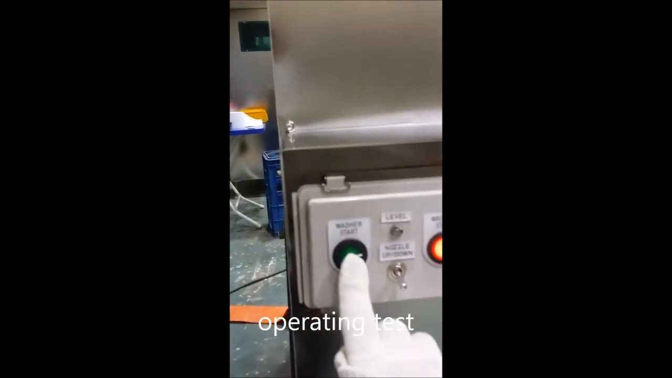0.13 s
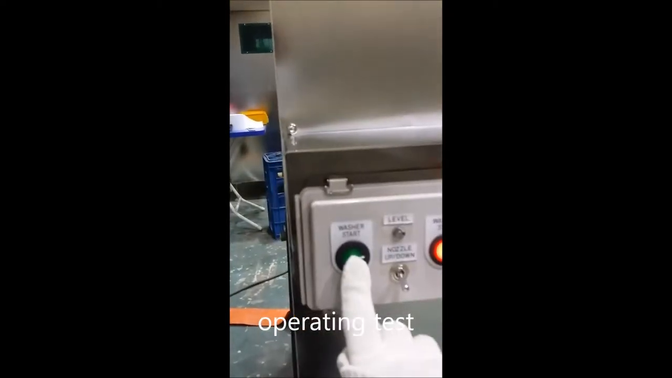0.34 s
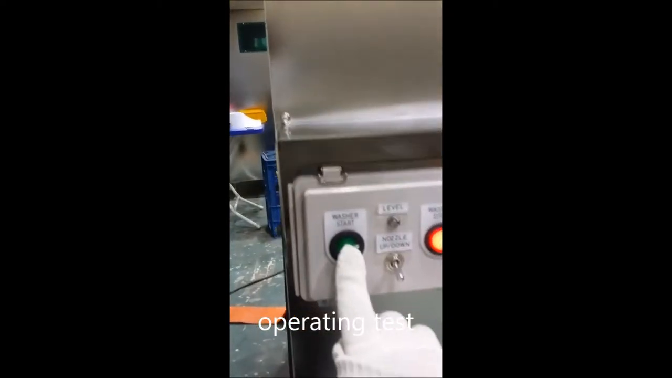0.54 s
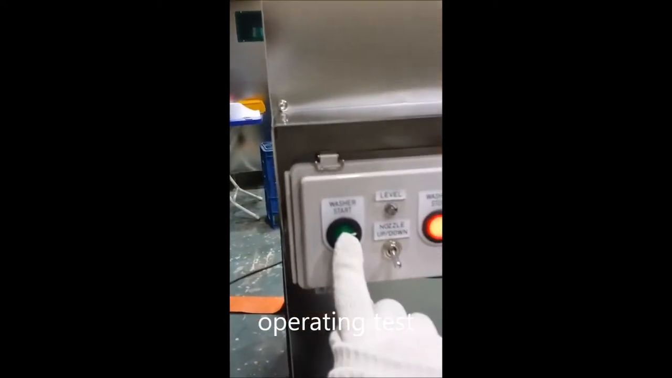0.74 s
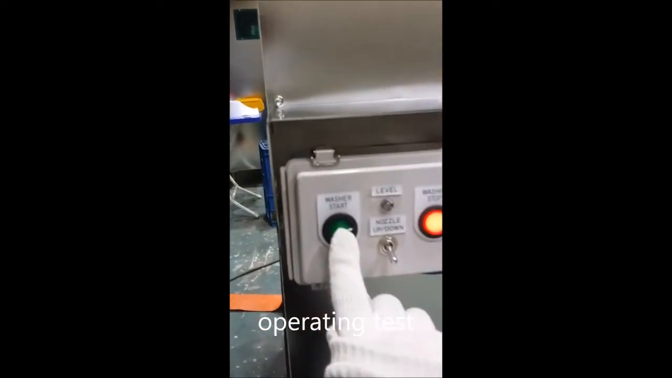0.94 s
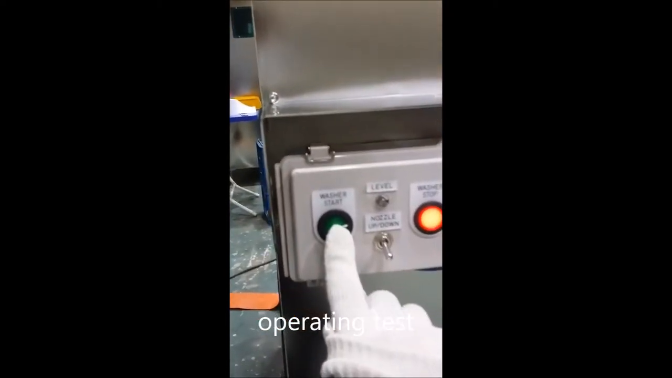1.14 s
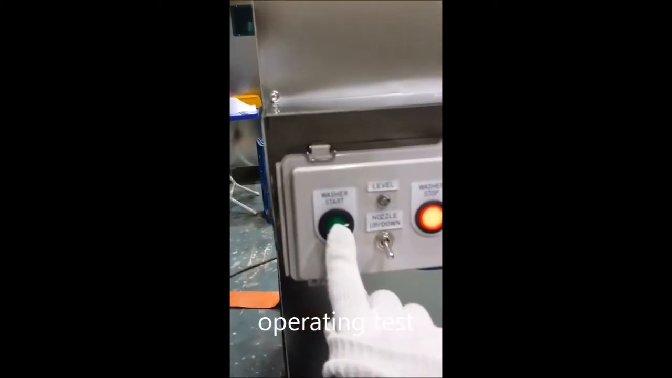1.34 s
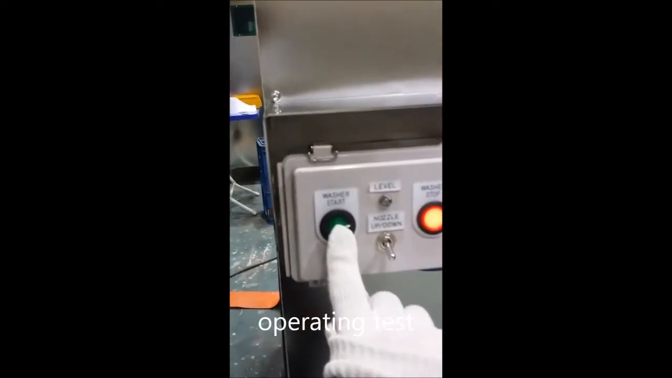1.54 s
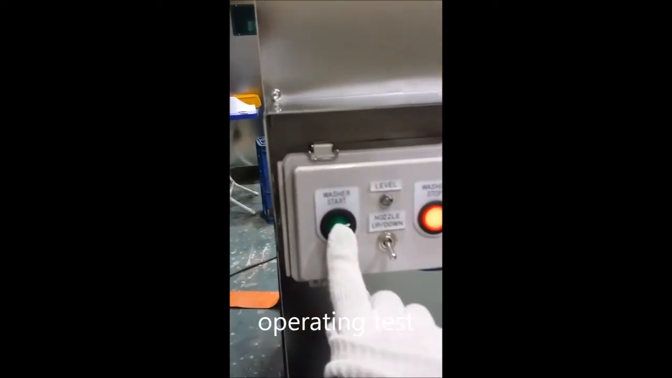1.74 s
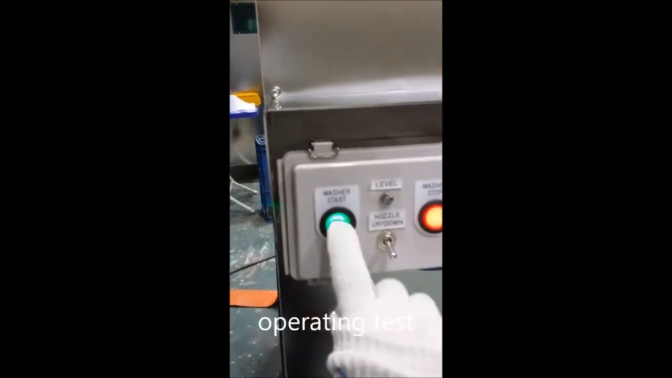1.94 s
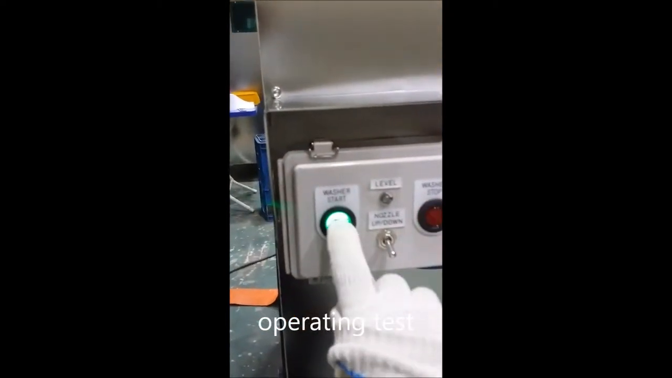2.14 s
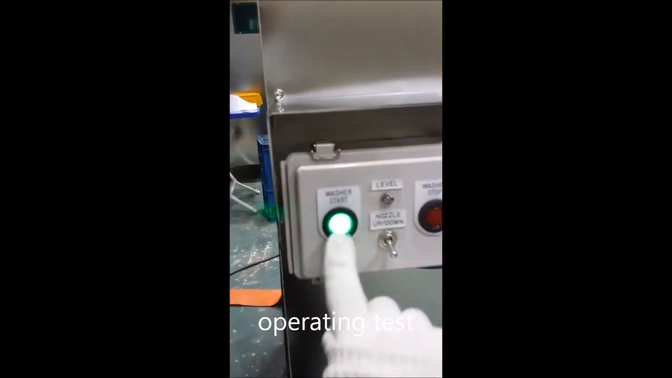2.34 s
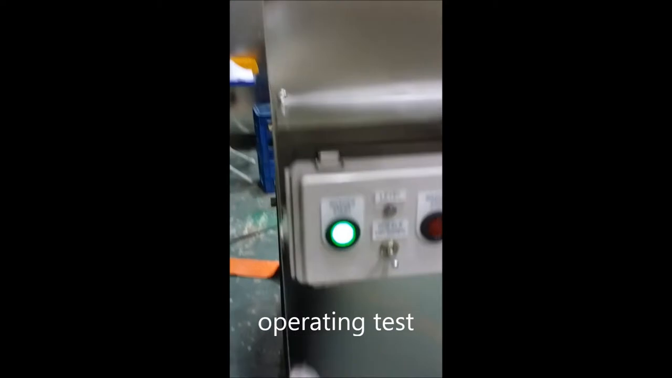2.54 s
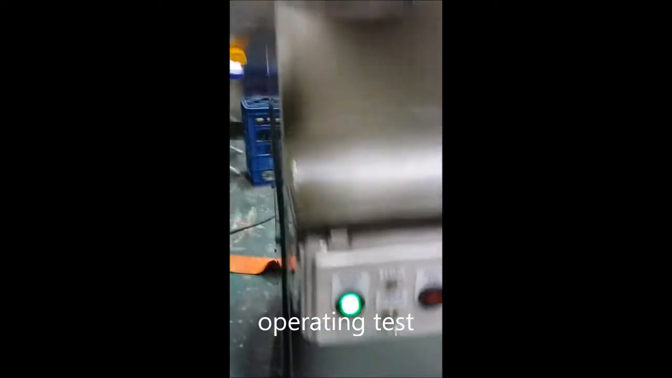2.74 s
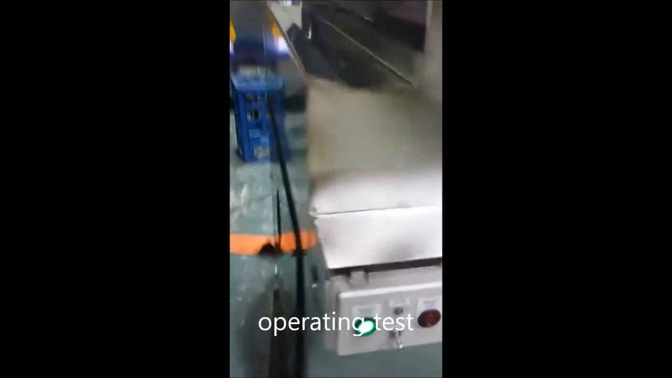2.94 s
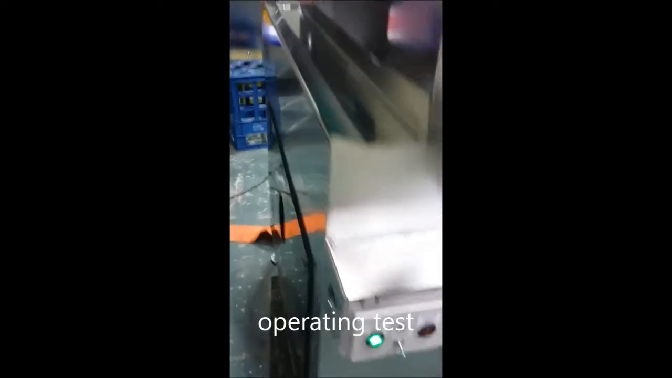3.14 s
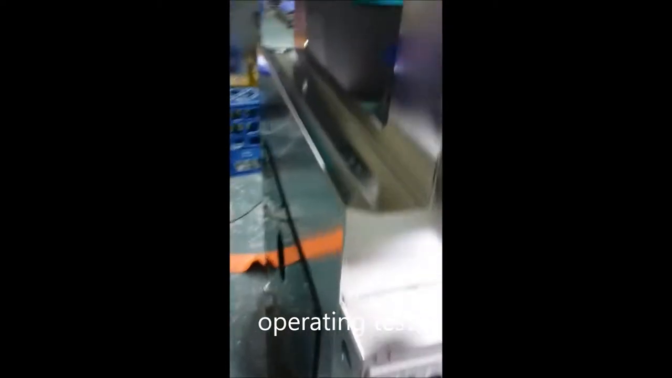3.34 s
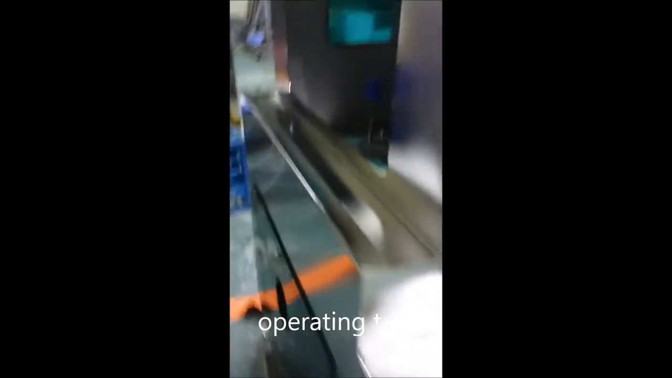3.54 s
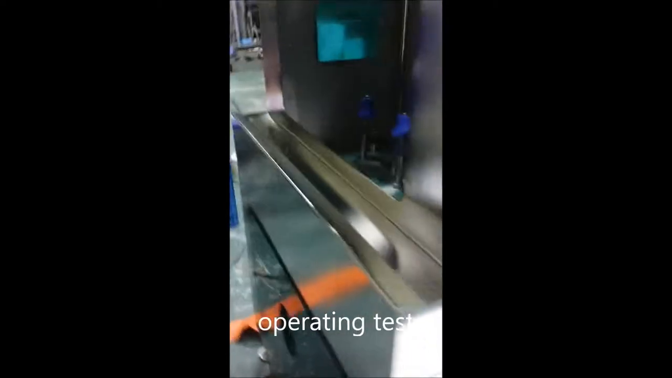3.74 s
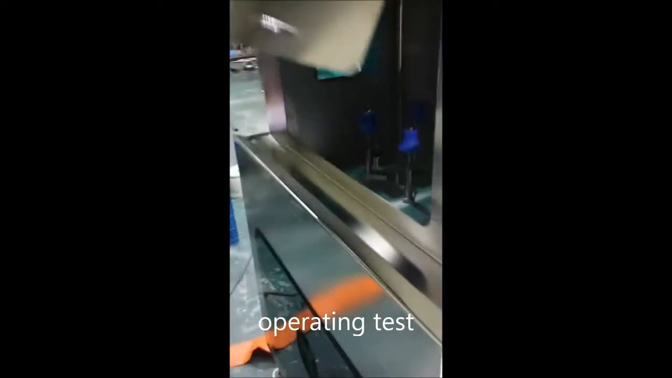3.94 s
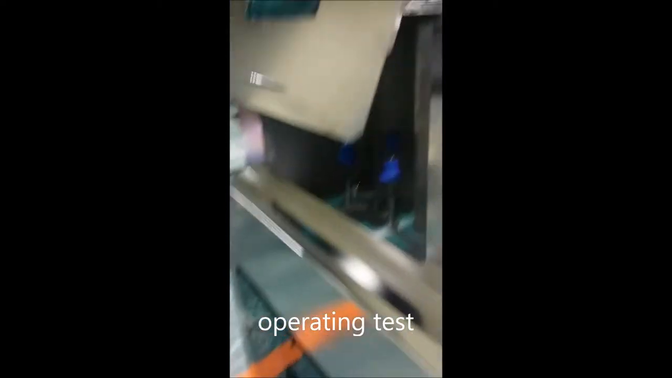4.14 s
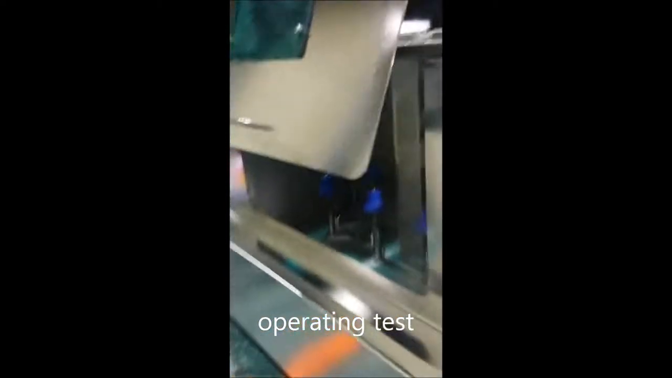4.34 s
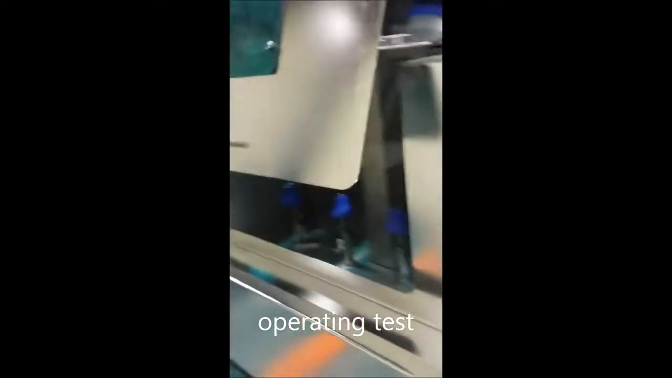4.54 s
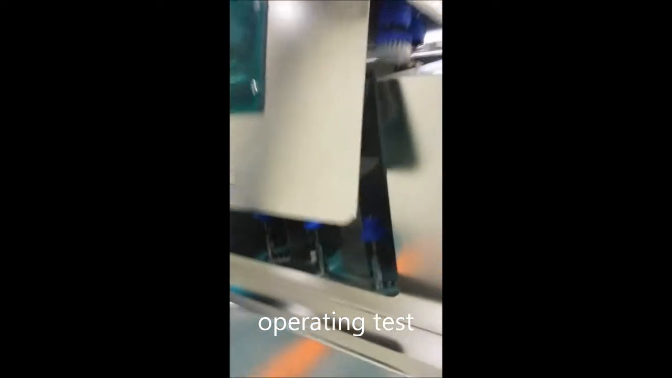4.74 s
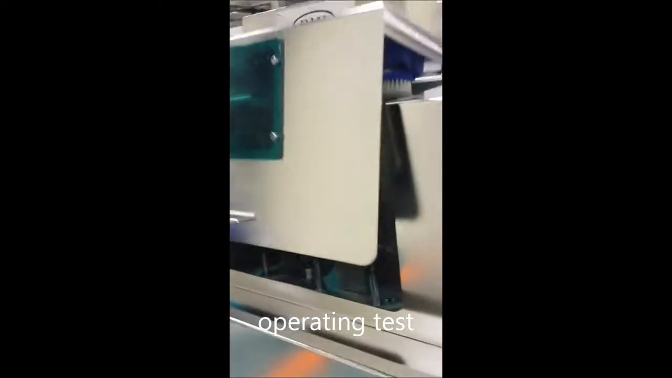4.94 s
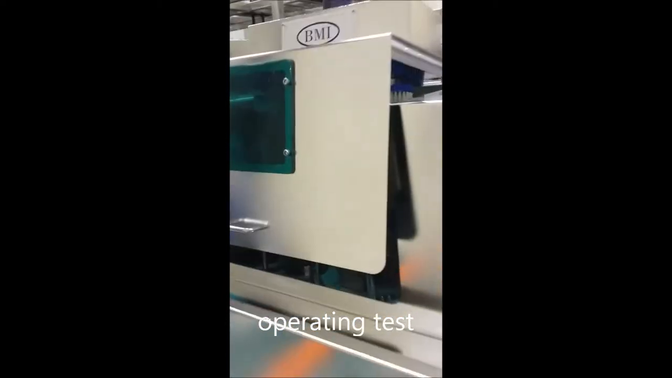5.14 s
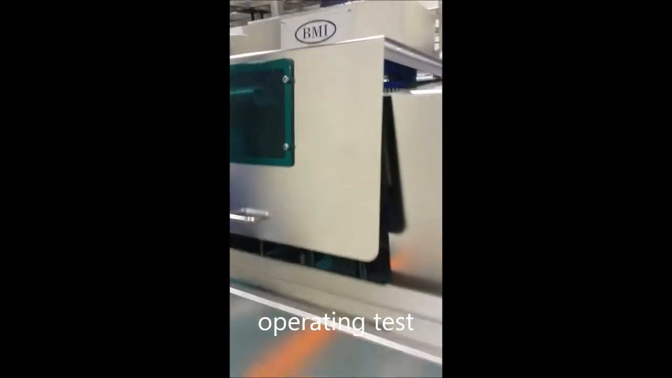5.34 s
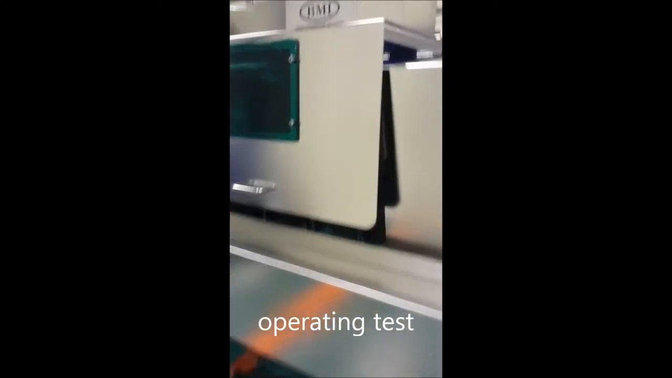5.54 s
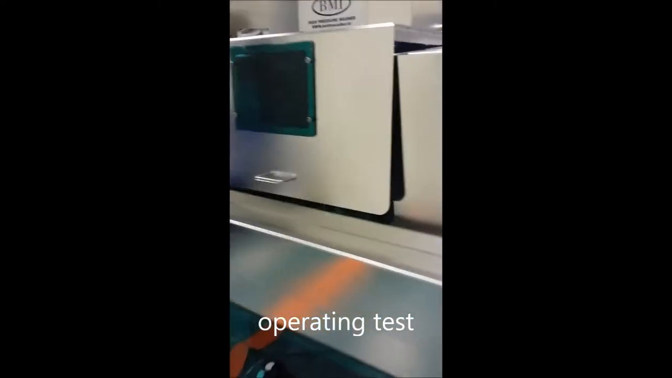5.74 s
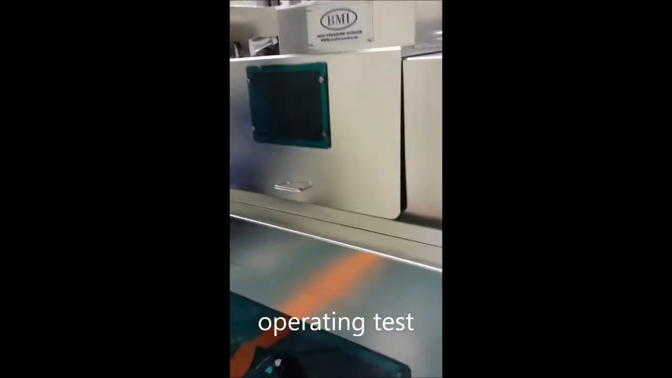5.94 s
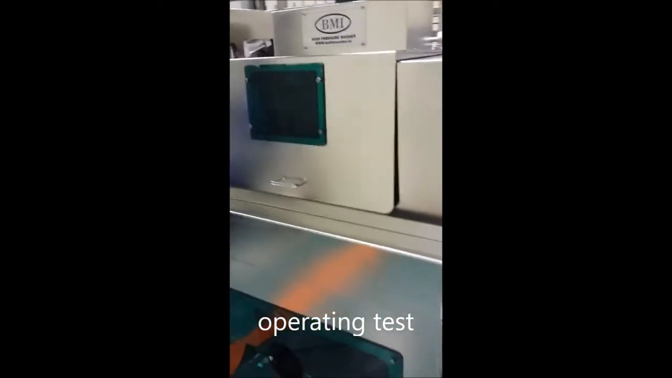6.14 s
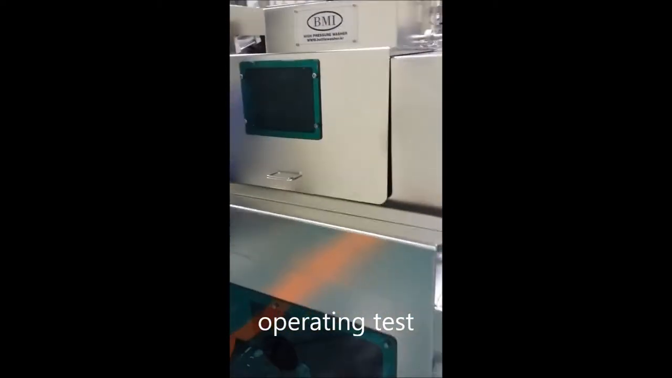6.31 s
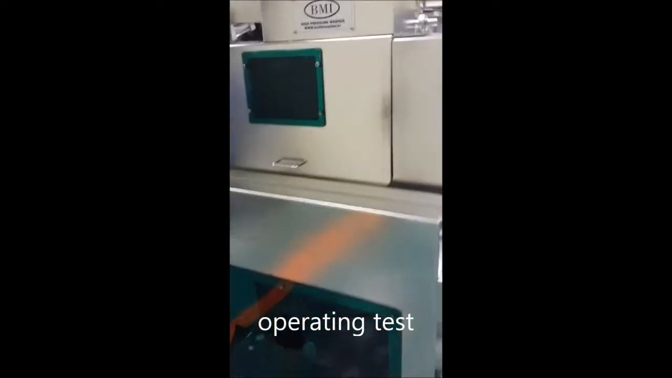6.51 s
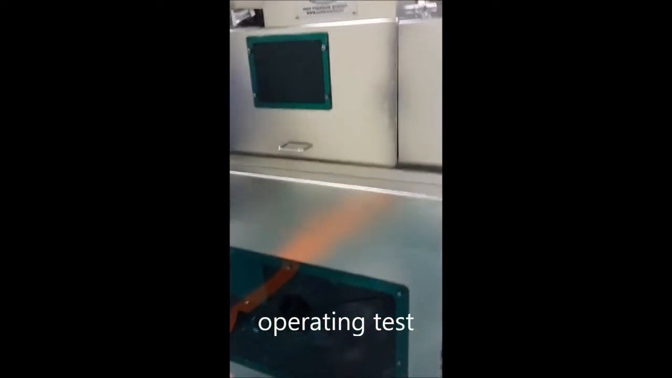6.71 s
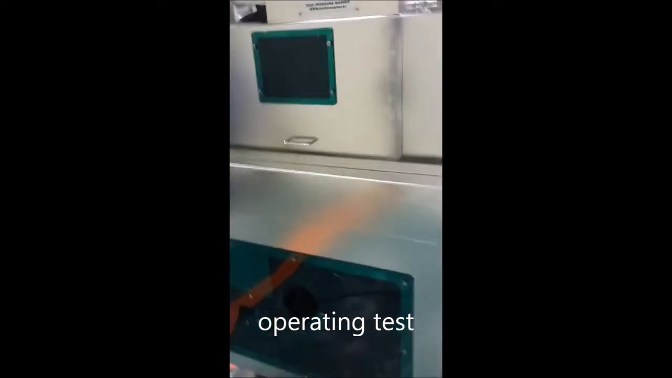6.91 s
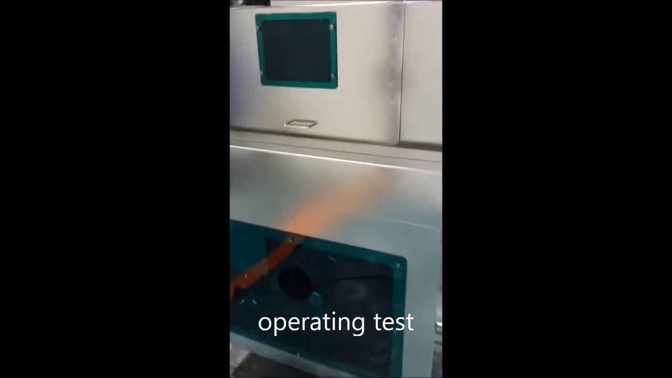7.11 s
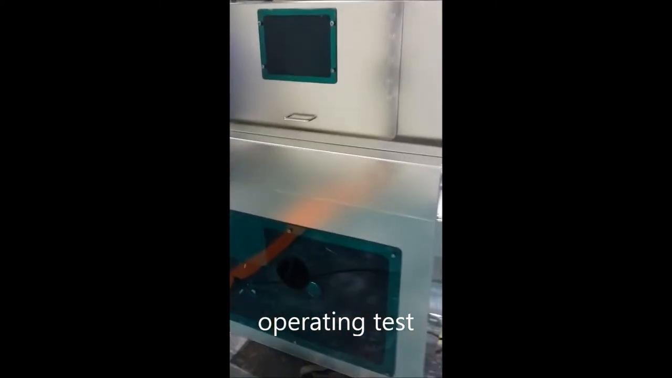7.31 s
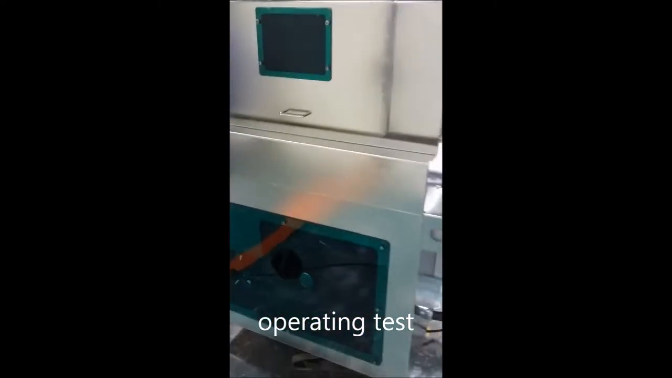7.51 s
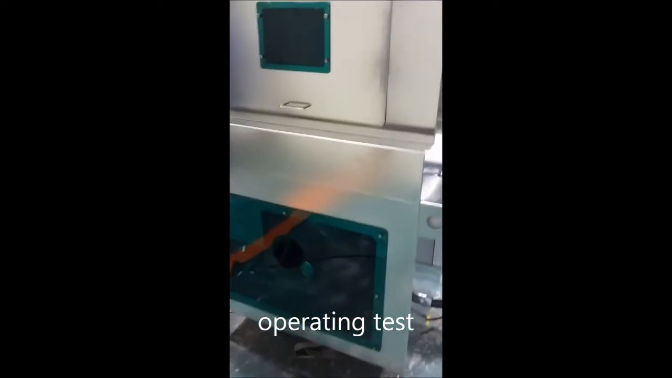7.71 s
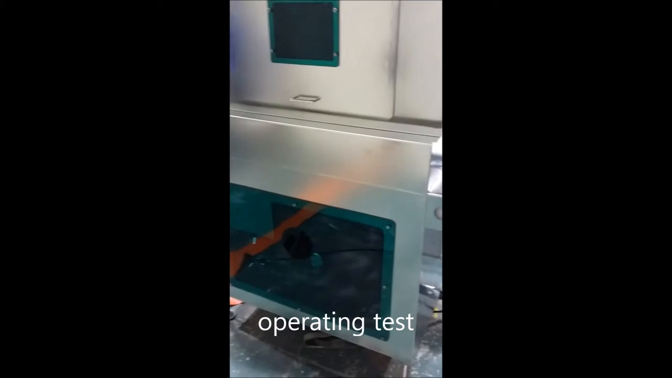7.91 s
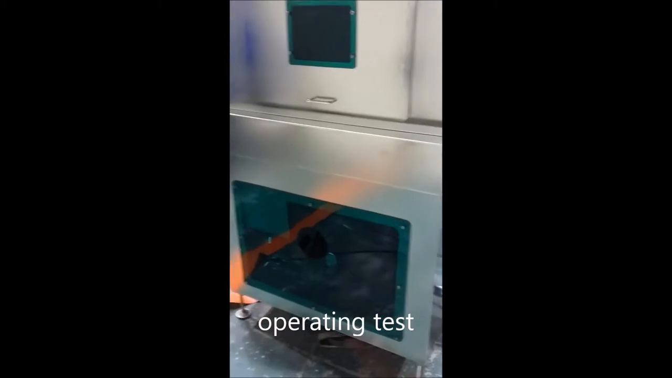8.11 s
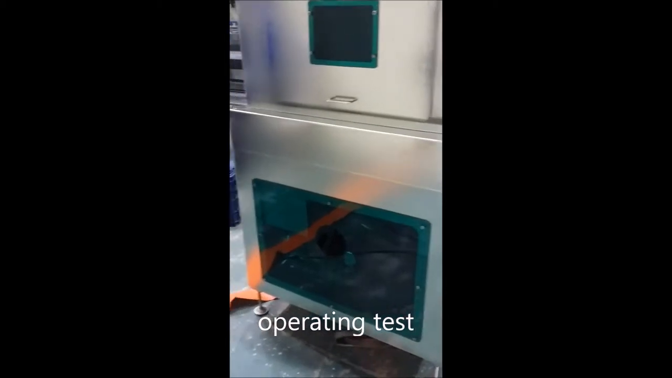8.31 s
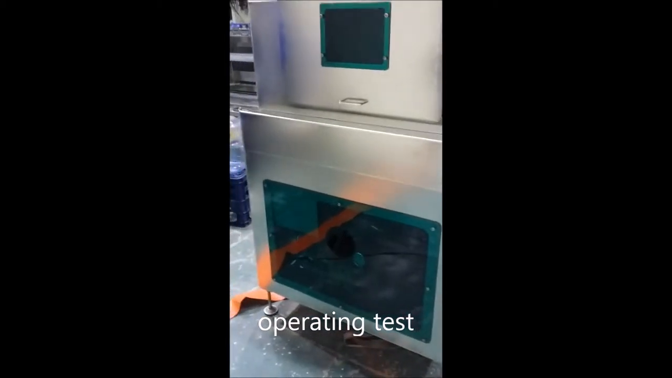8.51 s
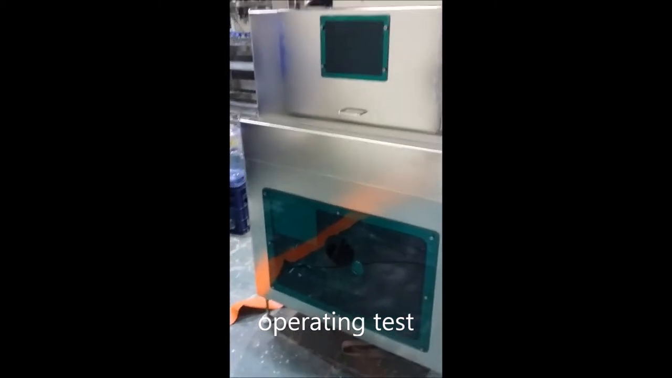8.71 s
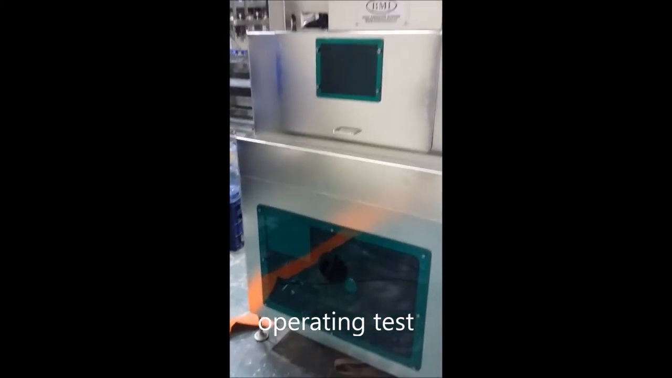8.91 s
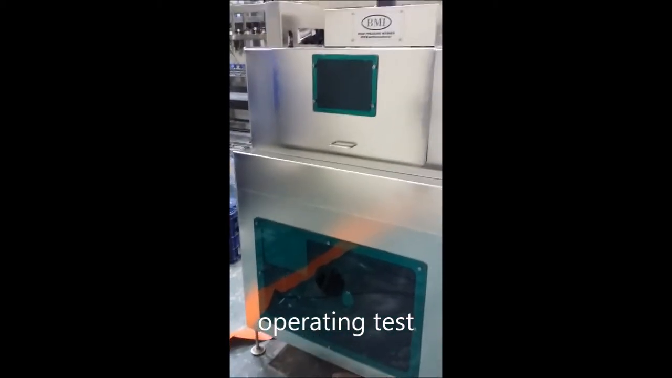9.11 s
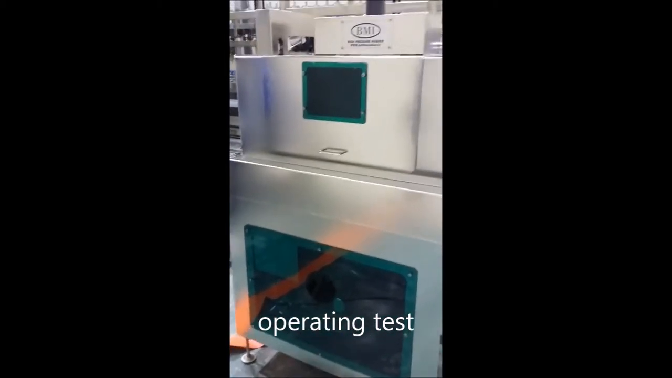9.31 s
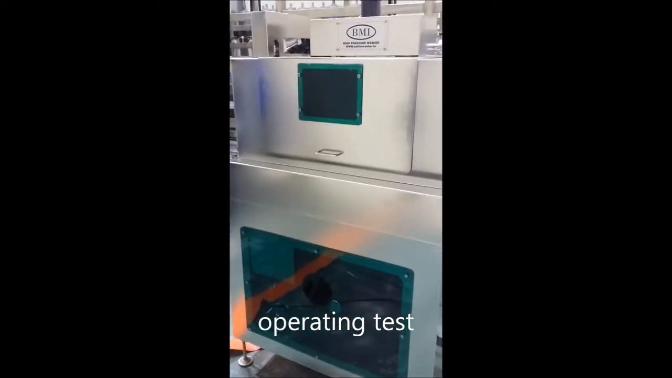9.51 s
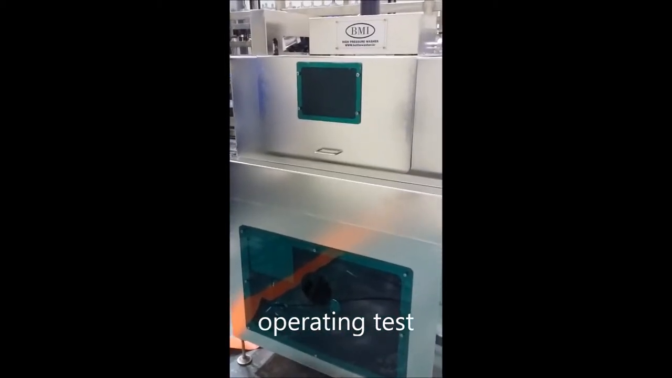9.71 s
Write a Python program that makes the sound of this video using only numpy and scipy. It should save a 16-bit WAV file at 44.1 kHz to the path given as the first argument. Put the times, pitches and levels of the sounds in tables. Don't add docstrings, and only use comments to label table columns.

```python
import sys
import numpy as np
from scipy import signal
from scipy.fft import rfft, irfft, next_fast_len
from scipy.io import wavfile
from scipy.ndimage import uniform_filter1d, minimum_filter1d

SR = 44100
rng = np.random.default_rng(int(sys.argv[2]) if len(sys.argv) > 2 else 0)


def decibels_to_gain(level_db):
    exponent = np.asarray(level_db, float) / 20
    return 10 ** exponent


def pcm_store(signal):
    levels = np.round(np.clip(np.atleast_2d(signal), -1, 1) * 32767)
    wavfile.write(sys.argv[1], SR, levels.astype(np.int16).T)


N = 430416
SECOND_VALVE_S = 6.88

# [t/s, left level/dB, right level/dB, left lead/rad]
HUM_WALK = [(0.0, -40.5, -36, 0.4), (0.7, -39, -34.5, .4), (1.9, -40, -36, .38), (2.5, -39.5, -35, 0.14),
            (2.8, -39.5, -36, 0.64), (3.2, -40, -40, 0.44), (4.0, -40, -39, .22), (4.5, -43, -40, .3),
            (5.3, -41, -41.5, 0.067), (5.6, -41.5, -44, 0.15), (6.35, -42, -44, -.28),
            (6.7, -37.5, -37, -0.0048), (7.25, -36, -33.5, -0.15), (8.0, -35.5, -32.5, -.06),
            (9.76, -34.5, -32, -.08)]
# [middle t/s, length/s, left level/dB, right level/dB, left lead/rad]
CRESTS_SECOND = [(3.1, 0.5, -59, -50.5, 0.0051), (4.4, 0.7, -65, -61, .2), (5.2, 0.35, -67, -65, -.9),
                 (5.75, 0.39, -59, -58, -1.1), (6.5, 0.71, -60, -54.5, 1), (8.8, 0.56, -63, -58, .8)]
CRESTS_THIRD = [(0.9, 3.7, -59, -57.5, -2), (2.3, 1, -64, -62, 2), (3.2, 0.94, -54, -49, 1.5),
                (3.95, 0.6, -53, -76, 0.5), (4.5, 1.6, -55, -50.5, -1.5), (5.15, 0.93, -58, -54, 1.7),
                (5.75, 1.4, -55, -49.5, 1.7), (6.35, 1, -55, -55, 1.4), (6.8, 0.87, -59, -52.5, 0.8),
                (8.7, 4.2, -59, -63, 2.1)]
CRESTS_FOURTH = [(0.9, 3, -64, -64, 2.7), (4.15, .8, -63, -68, .3), (6.1, 1.5, -78, -60, .4)]
CRESTS_FIFTH = [(0.6, 1.6, -61, -55.5, -3), (1.7, 0.92, -72, -60, -9), (2.6, 0.56, -68, -54, -4),
                (3.5, 0.31, -53, -50, -2), (4.2, 1.16, -59, -50, 4), (4.65, 0.44, -57, -69, -1.5),
                (5.3, 0.53, -56, -49.5, -2.5), (5.8, .6, -57, -58, 4), (6.3, 0.48, -56, -48.5, 3.5),
                (7.4, 1.5, -62, -61, -2), (8.1, 0.69, -55, -60, -8), (9.1, 1, -68, -70, 2)]
# [t/s, level/dB]
FAN_WALK = [(0, -59), (3.0, -56), (3.3, -65), (5.4, -66), (5.8, -56), (6.3, -60.5), (9.76, -58)]
# [f/Hz, level/dB per Hz]
HALL_COLOUR = [(20, -29), (45, -9), (60, -8), (100, 1.5), (170, -2), (500, -11), (650, -13), (900, -17.5),
               (1600, -14.5), (2500, -20.5), (5500, -24.5), (6500, -22.5), (7600, -22.5), (15500, -32.5)]
# [peak t/s, rumble level/dB, murmur level/dB, t60/s]
BOOMS = [
    (2.13, -46, -48.5, 2.1),
    (3.12, -66, -56, 1.9),
    (3.55, -62, -54, 1.5),
    (7.09, -38, -39, 1.9),
    (9.15, -45, -71, 3.6),
]
# [f/Hz, likeness -1..1]
LIKENESS = [(60, 1), (180, 0.85), (550, 0.38), (1650, -0.11), (4970, 0.066), (15000, -0.084)]
# [f/Hz, left minus right level/dB]
PORT_BALANCE = [(60, 5), (99, -5), (160, -1), (270, -8), (450, -1.5), (740, -2), (1220, -6), (1850, -6.5),
                (2300, 1), (3200, -1.5), (4100, -0.5), (5000, 3), (5800, 7), (6600, 9), (7000, 6),
                (7450, 1.5), (8400, -8), (9600, -4), (12000, 0), (15000, 2)]
# [middle t/s, length/s, f/Hz, width/Hz, level/dB]
STRANDS = [(0.46, .7, 1550, 350, -57), (4.3, .5, 5600, 500, -51), (4.2, .7, 8200, 500, -52),
           (7.4, .3, 6100, 110, -47), (7.45, 0.32, 5600, 130, -46), (8.25, .9, 5000, 80, -42.5),
           (8.35, 0.66, 4950, 340, -47), (10, 0.55, 4720, 70, -47), (8.75, 0.36, 4930, 70, -41),
           (9.4, 1, 4760, 190, -42.5), (9.45, 0.85, 4550, 100, -41), (9.5, .4, 3700, 82, -49),
           (9.3, .6, 5220, 100, -46), (15, .6, 5170, 100, -47), (7.25, .4, 6860, 140, -40),
           (8.6, 0.53, 6850, 140, -44), (7.5, .3, 6670, 100, -39), (7.6, 0.3, 7300, 70, -47),
           (9.3, .7, 7600, 64, -50), (9.05, .35, 4700, 60, -48), (9.5, .45, 6480, 70, -46),
           (7.05, 0.48, 3500, 230, -50), (7.05, 0.2, 4000, 150, -49)]
# [t/s, hiss level/dB, view into the cabinet 0..1, pan/dB]
EXHAUST_A = [(2.2, -39.5, 0.2, 4), (2.4, -41.5, 0.45, 2.5), (2.9, -41.5, 1, 0), (3.63, -42, 0.3, 2),
             (3.87, -40.5, 0.3, 0.5), (4.3, -42, 0.35, 1.5), (5.1, -42, .4, 0.7), (6.25, -44, 0.4, 2.5),
             (6.86, -47, 0.1, 2.8)]
# [f/Hz, level/dB per Hz]
COLOUR_A = [(530, -23.5), (900, -22.5), (1210, -19), (2100, -21), (3150, -14), (3540, -9), (4050, -9),
            (4600, -6), (5440, 1), (6270, -9), (7060, 2.5), (9180, -4), (10300, -12), (14400, -7.5),
            (15500, -13.5)]
COLOUR_B = [(350, -58), (600, -21.5), (1030, -9.5), (1470, -2.5), (1760, -5.5), (2610, -3), (3870, -2.5),
            (4750, -2), (5980, -5.5), (6670, -1), (8870, -2.5), (9600, -8.5), (10200, -17.5), (12600, -24),
            (13300, -10.5), (14200, -13.5), (15500, -28)]
# [f/Hz, width/Hz, level against the hiss/dB]
PIPES_A = [(3520, 280, -15.5), (4660, 250, -11), (5350, 500, -15), (6900, 130, -12), (9220, 220, -18)]
PIPES_B = [(1475, 51, -20), (2580, 230, -14.5), (4580, 140, -13), (4745, 160, -11.5), (5210, 105, -17),
           (5250, 130, -18), (6550, 120, -27), (6880, 220, -29), (6900, 140, -20), (7500, 100, -38)]
ECHO_S = [.0031, .0067, .0113, .0171, .0243]
# [t/s, f/Hz, peak level/dB, t60/s]
KNOCKS = [(1.9865, 3630, -21, .015), (2.006, 95, -27, 0.2), (2.004, 297.3, -24.5, 0.55),
          (2.008, 757, -29.5, .15), (2.024, 546, -31.5, 0.3), (2.055, 444, -31, .2),
          (2.055, 109.6, -28, 0.55), (2.105, 553, -34.5, 0.37), (2.15, 467, -36, 0.18),
          (2.07, 686, -37, .15), (2.19, 312, -28.5, 0.26), (2.2, 199, -39, 0.21), (2.215, 460, -33, .12),
          (2.266, 534, -35, 0.097), (2.0185, 3600, -19, .015), (2.0185, 4720, -13, .015),
          (2.0443, 298, -23.5, 0.38), (2.064, 215, -20, 0.1), (2.148, 290, -21, 0.072),
          (2.2455, 4150, -17, 0.018), (2.2455, 5040, -24.5, 0.023), (2.251, 1780, -29, 0.03),
          (2.2465, 12400, -33, 0.036), (2.25, 880, -35, 0.095), (2.262, 84, -36, 0.51),
          (3.89, 131, -31, 0.22), (3.96, 145.8, -37, .3), (5.222, 134, -34, .15), (5.254, 350, -27, 0.059),
          (5.254, 410, -29, 0.061), (5.315, 119, -31, .08), (6.108, 293, -32.5, 0.091),
          (6.899, 163.2, -18.5, 0.31), (6.9, 5250, -25, .08), (6.901, 6560, -20, 0.069),
          (6.95, 289.3, -17.5, 0.3), (6.955, 667, -29, 0.092), (6.957, 3900, -18, .05),
          (7.14, 169, -25, .2), (6.957, 4690, -14, 0.044), (6.894, 473, -34, .4), (7.03, 560, -30.5, 0.17),
          (7.065, 369, -23.5, 0.14), (7.008, 294, -21, 0.2), (7.1, 260, -27, 0.17), (7.12, 118.3, -35, .2),
          (7.17, 443, -31, 0.13), (7.265, 330, -29, 0.14), (6.961, 149, -15.5, 0.12),
          (7.041, 125, -21, 0.17), (7.07, 187.5, -23, 0.28), (7.165, 292.4, -24.5, 0.27),
          (2.148, 234, -25, 0.088), (2.115, 215, -25, 0.1), (2.312, 253, -31, 0.17),
           (1.9865, 4320, -29, .012), (2.246, 3900, -26, .014), (6.985, 110, -24.5, .1),
           (7.115, 125, -26, .12), (2.13, 110, -29, .15), (2.011, 4300, -16, .012),
           (2.0185, 4200, -13, .012), (2.0185, 5230, -16, .012), (2.246, 4700, -22, .015),
           (2.246, 870, -38, .05), (6.893, 752, -28, .12), (6.905, 3640, -26, .04), (6.912, 3220, -26, .04),
           (7.04, 279, -20.5, .2), (7.096, 205, -21, 0.15), (7.14, 240, -27, .08), (7.165, 238, -26, .1),
           (7.19, 290, -28, 0.09), (7.22, 242, -28, 0.18), (7.285, 520, -38, .1), (7.375, 478, -38, .06)]
# [t/s, f/Hz, peak level/dB, t60/s]
DOOR_THUDS = [(5.15, 107, -35, .15), (5.555, 105, -35, .18), (5.62, 115, -37, .15), (5.705, 120, -35, 0.11),
              (5.775, 110, -35, .15), (5.801, 257, -41, .2)]
# [t/s, hiss level/dB, level under 3 kHz/dB, rise/s, decay stretch]
BLASTS = [(1.987, -25, -12, 0.0005, 0.018), (1.987, -33, 1, .002, 0.1), (1.999, -22, -22, .001, .2),
          (2.0, -11, -13, 0.022, 0.24), (2.007, -20.5, -2.5, 0.0027, 0.67),
          (2.2452, -29.5, 8.5, 0.0006, 0.027), (3.83, -35.5, 2.5, 0.067, 0.51),
          (4.73, -43, 0, 0.0092, 0.23), (6.882, -28, 2, 0.0047, 0.075), (6.89, -15, -5.5, 0.0039, 0.54),
          (6.953, -18, 2, 0.0022, 0.12)]
# [f/Hz, level/dB per Hz]
BLAST_COLOUR = [(240, -20), (400, -0.5), (545, -5), (1200, -7.5), (1710, -4), (2880, -9.5), (3640, -5.5),
                (5960, -5.5), (14800, -9), (15400, -10), (16100, -45)]
# [f/Hz, t60/s]
BLAST_T60 = [(400, 0.95), (1500, 2.35), (4000, 1.43), (8000, 1.13), (15000, 0.6)]
# [t/s, f/Hz, level/dB, t60/s, pan/dB]
RINGS = [(1.999, 5980, -24.5, 0.34, 14), (2.006, 1600, -34, 0.48, -6), (2.17, 1580, -40, 1.1, -6),
         (2.01, 8300, -27, .3, -10), (2.012, 4750, -36, 0.65, -5), (2.014, 3560, -35, .2, -1),
         (6.893, 5200, -22, 0.16, 3), (6.898, 6750, -26, .25, 3), (6.902, 3400, -29, .2, 3),
         (6.915, 8800, -25, .15, -5)]
# [t/s, level/dB, t60/s]
THUMPS = [
    (2.007, -25.5, 0.72),
    (2.245, -46, 0.048),
    (3.83, -68.5, 1.5),
    (4.73, -60, .3),
    (6.89, -30, 0.54),
    (6.955, -28.5, 0.35),
]
# [f/Hz, first valve level/dB, second valve level/dB, t60/s]
PANELS = [(61, -23, -12, 0.52), (95, -15, -12, 0.41), (125, -7.5, -9, 0.11), (163.4, -14, 0, 0.17),
          (215, -5, -1, 0.17), (303, -12, 0, 0.51), (347, -10.5, -23, 0.32), (454.5, -14, -9, 0.35),
          (520, -19, -12, 0.27), (656, -27, -18, 0.11), (769, -19, -14, 0.071), (877, -21, -26, 0.14),
          (1620, -18, -30, .025)]
# [t/s, length/s, f/Hz, glide/Hz, level/dB]
WHISTLES = [(7.054, 0.029, 4740, 4.5, -34), (7.13, .1, 4660, 0, -39), (7.16, .05, 6900, -1, -31),
            (7.34, 0.091, 4760, 4, -32), (7.403, 0.051, 4680, 0, -33), (7.4, 0.055, 5050, 0, -36),
            (7.52, .085, 4760, 10, -35.5), (7.525, 0.087, 6550, -100, -37), (7.63, .12, 7180, 6, -40),
            (8.319, .04, 4940, 0, -37), (8.869, 0.086, 4920, -20, -29.5), (9.005, 0.055, 4750, 0, -35),
            (9.07, 0.032, 4700, -1, -35), (9.097, 0.04, 4690, 0, -40), (9.475, .05, 4750, 0, -37)]
# [f/Hz, level against the mean of 4-9 kHz/dB]
MASKED = [(2000, -38), (2200, -7.5), (2700, -11.5), (3250, -6), (3500, -21), (3850, -6), (4300, -7.5),
          (4500, -40), (9500, -38), (10000, -13), (14500, -18), (15100, -10.5), (15400, -6), (15500, 8)]
# [depth/dB], [bar over own level/dB]
THINNING = ([6, 12, 17, 22], [-12, 0, 4.5, 6])


def rms_one(x):
    return x / np.sqrt(np.mean(x ** 2) + 1e-20)


def in_time(rows):
    s, *columns = np.transpose(rows)
    return [np.interp(np.arange(N) / SR, s, column) for column in columns]


def at_hz(points, hz):
    table_hz, value = np.array(points).T
    return np.interp(np.log(hz + 1), np.log(table_hz), value)


def panned(x, pan_db):
    return x * decibels_to_gain(np.array([pan_db / 2, -pan_db / 2]).reshape(2, -1))


def drift(rate):
    r = np.exp(-80 * np.pi * rate / SR)
    white = rng.standard_normal(N // 40 + 2002)
    slow = signal.lfilter([1], [1, -2 * r, r * r], white)[2000:]
    return np.interp(np.arange(N) / 40, np.arange(len(slow)), rms_one(slow))


def noise_parts(spectrum, edges, size):
    long = next_fast_len(size)
    hz = np.fft.rfftfreq(long, 1 / SR)
    alike = np.clip(at_hz(LIKENESS, hz), -1, 1)
    mid, side = rfft(rng.standard_normal((2, long))) * decibels_to_gain(at_hz(spectrum, hz))
    pair = np.sqrt(1 + alike) * mid + np.sqrt(1 - alike) * side * np.array([[1], [-1]])
    pair = panned(pair, at_hz(PORT_BALANCE, hz))
    above = [1 / (1 + (edge / (hz + 1)) ** 8) for edge in edges]
    masks = -np.diff([np.ones(len(hz))] + above + [np.zeros(len(hz))], axis=0)
    return [irfft(pair * mask, long)[:, :size] for mask in masks]


def resonate(x, hz, width_hz):
    r = np.exp(-np.pi * width_hz / SR)
    poles = [1, -2 * r * np.cos(2 * np.pi * hz / SR), r * r]
    return signal.lfilter([(1 - r * r) / 2, 0, (r * r - 1) / 2], poles, x)


def sing(white, hz, width_hz):
    return rms_one(resonate(resonate(white, hz, width_hz), hz, width_hz))


def add_at(out, s, sound):
    start = round(s * SR)
    out[:, start:start + sound.shape[1]] += sound


def swell_at(s, length):
    span = slice(max(round((s - length / 2) * SR), 0), min(round((s + length / 2) * SR), N))
    return span, np.cos(np.pi * (np.arange(span.start, span.stop) / SR - s) / length)


FLUTTER_DB = 1.8


def crests(rows):
    out = decibels_to_gain(-71 + 0.97 * np.array([drift(1.7), drift(1.0)])) + 0j
    for s, length, left_db, right_db, lead in rows:
        span, swell = swell_at(s, length)
        out[:, span] += swell * np.array([[decibels_to_gain(left_db) * np.exp(1j * lead)], [decibels_to_gain(right_db)]])
    return out * decibels_to_gain(FLUTTER_DB * drift(2.3))


def pump():
    pump_hz, fan_hz = 250.36, 853
    t = np.arange(N) / SR
    fan_db, = in_time(FAN_WALK)
    fan_turn = 2 * np.pi * fan_hz * t + np.array([[0], [.8]])
    fan = decibels_to_gain(fan_db + FLUTTER_DB * drift(6.4)) * np.sin(fan_turn)
    left_db, right_db, lead = in_time(HUM_WALK)
    first = np.array([decibels_to_gain(left_db) * np.exp(1j * lead), decibels_to_gain(right_db)])
    overtones = [CRESTS_SECOND, CRESTS_THIRD, CRESTS_FOURTH, CRESTS_FIFTH]
    heights = [first] + [crests(rows) for rows in overtones]
    turn = 2 * np.pi * np.cumsum(pump_hz + 0.247 * drift(0.482)) / SR
    hum = sum(np.imag(height * np.exp(1j * k * turn)) for k, height in enumerate(heights, 1))
    return fan + np.sqrt(2) * hum


def hall():
    rumble_db, rumble_loss_db_per_s, murmur_db = -48.5, 0.05, -54
    wash_murmur_db, boom_rise_db_per_s = -53, 131
    t = np.arange(N) / SR
    rumble_power = decibels_to_gain(2 * (rumble_db - rumble_loss_db_per_s * t))
    murmur_power = decibels_to_gain(2 * murmur_db) + decibels_to_gain(2 * wash_murmur_db) * (t > SECOND_VALVE_S)
    for s, boom_rumble_db, boom_murmur_db, t60 in BOOMS:
        shape_db = np.minimum(boom_rise_db_per_s * (t - s), -60 * (t - s) / t60)
        rumble_power = rumble_power + decibels_to_gain(2 * (boom_rumble_db + shape_db))
        murmur_power = murmur_power + decibels_to_gain(2 * (boom_murmur_db + shape_db))
    low, mid, top = map(rms_one, noise_parts(HALL_COLOUR, [250, 1300], size=N))
    rumble = panned(low * np.sqrt(rumble_power) * decibels_to_gain(1.0 + 0.53 * drift(3.7)), 0.5)
    murmur = mid * np.sqrt(murmur_power) * decibels_to_gain(4.5 + 0.47 * drift(7.0))
    return rumble + murmur + top * decibels_to_gain(-47)


def strands():
    out = np.zeros((2, N))
    for s, length, hz, width_hz, db in STRANDS:
        span = slice(round((s - length / 2) * SR), min(round((s + length / 2) * SR), N))
        swell = np.cos(np.pi * (np.arange(span.start, span.stop) / SR - s) / length)
        white = rng.standard_normal((2, SR + SR // 2))[:, :len(swell)]
        if len(swell):
            sung = panned(sing(white, hz, width_hz), at_hz(PORT_BALANCE, hz))
            out[:, span] += decibels_to_gain(db) * np.sqrt(abs(swell)) * sung
    return out


def exhaust(flow, colour, pipes, low_db, top_db, top_gain_db, surge_low_db, surge_s,
            start_s, stop_s, flutter_db, top_hz):
    hiss_db, bright, pan_db = flow
    t = np.arange(N) / SR
    low_db = low_db + surge_low_db * np.exp(-np.maximum(t - start_s, 0) / surge_s)
    top_db = top_db + top_gain_db * bright
    low, body, top = map(rms_one, noise_parts(colour, [3000, top_hz], size=N))
    jet = body + low * decibels_to_gain(low_db + flutter_db * drift(3.2))
    jet += top * decibels_to_gain(top_db + flutter_db * drift(10.0))
    span = slice(round(start_s * SR), min(round(stop_s * SR), N))
    white = rng.standard_normal((2, N))[:, span].copy()
    for hz, width_hz, db in pipes:
        sung = panned(sing(white, hz, width_hz), at_hz(PORT_BALANCE, hz))
        wander = np.array([drift(2.8)[span], drift(4.1)[span]])
        jet[:, span] += sung * decibels_to_gain(db + 1.5 * wander)
    gate = np.clip((t - start_s) / 0.11, 0, 1) * np.clip((stop_s - t) / 0.041, 0, 1)
    return panned(jet * gate * decibels_to_gain(hiss_db + 2.0 + flutter_db * drift(29.0)), pan_db - 2.0)


def reflections(x):
    echo_db, sway_s = -8, .00006
    n, out = np.arange(N), x.copy()
    for port in range(2):
        for lag_s in ECHO_S:
            lag = (lag_s * rng.uniform(.9, 1.1) + sway_s * drift(.6)) * SR
            out[port] += decibels_to_gain(echo_db) * np.interp(n - lag, n, x[port])
    return out / np.sqrt(1 + len(ECHO_S) * decibels_to_gain(2 * echo_db) * 0.86)


def knocks():
    port_lag_s, lag_up_to_hz = .00024, 550
    out = np.zeros((2, N + SR))
    for s, hz, db, t60 in KNOCKS + DOOR_THUDS:
        t = np.arange(min(round(t60 * SR), SR)) / SR
        lead = min(hz, lag_up_to_hz) * np.array([[0], [port_lag_s]])
        swing = panned(np.sin(2 * np.pi * (hz * t + lead)), at_hz(PORT_BALANCE, hz))
        attack = np.clip(t * min(hz, 900) / 2.0, 0, 1)
        add_at(out, s, decibels_to_gain(db - 60 * t / t60) * swing * attack)
    return out[:, :N]


def valves():
    out, t = np.zeros((2, N + SR)), np.arange(SR) / SR
    edges, centres = np.geomspace(600, 12000, 7), np.geomspace(470, 15000, 8)
    for s, hiss_db, low_db, rise, stretch in BLASTS:
        attack = np.clip(t / max(rise, 1e-4), 0, 1)
        parts = noise_parts(BLAST_COLOUR, edges, size=SR)
        hiss = np.zeros((2, SR))
        for part, hz in zip(parts, centres):
            t60 = stretch * at_hz(BLAST_T60, hz)
            hiss += part * decibels_to_gain(low_db * (hz < 3000) - 60 * t / t60)
        hiss *= attack * decibels_to_gain(hiss_db) / np.std(sum(parts))
        is_tick = stretch < .12
        add_at(out, s, panned(hiss, 3.5 if is_tick else -0.5))
    return out[:, :N]


def rings():
    out, t = np.zeros((2, N + SR)), np.arange(SR // 2) / SR
    for s, hz, db, t60, pan_db in RINGS:
        sung = sing(rng.standard_normal((2, len(t))), hz, width_hz=260)
        attack = np.clip(t / 0.0034, 0, 1)
        fade = np.clip((t[-1] - t) / 0.074, 0, 1)
        add_at(out, s, panned(sung * attack * decibels_to_gain(db - 60 * t / t60) * fade, pan_db))
    return out[:, :N]


def panels():
    out, t = np.zeros((2, N + SR)), np.arange(SR) / SR
    for s, thump_db, shake_t60 in THUMPS:
        shape = np.clip(t / 0.0021, 0, 1) * decibels_to_gain(-60 * t / shake_t60)
        mid, side = rng.standard_normal((2, SR)) * shape
        shake = panned(mid + 0.3 * side * np.array([[1], [-1]]), -2.5)
        for hz, first_db, second_db, t60 in PANELS:
            width_hz = np.log(1000) / np.pi / t60
            level_db = thump_db + (first_db if s < SECOND_VALVE_S else second_db)
            gain = decibels_to_gain(level_db) * np.sqrt(SR / np.pi / width_hz)
            add_at(out, s, resonate(shake, hz, width_hz) * gain)
    return out[:, :N]


def second_flow():
    t = np.arange(N) / SR
    since = np.maximum(t - 7.0, 0)
    hiss_db = -33.5 + 5 * np.exp(-since / 0.42) - 0.28 * since
    pressure = np.clip(1 - since / 1.9 / 1.1, 0, 1)
    swing = np.exp(-((t - 7.8) / 0.6) ** 2)
    return hiss_db, pressure, 2.5 + swing


def whistles():
    out = np.zeros((2, N))
    for s, length, hz, glide_hz, db in WHISTLES:
        t = np.arange(round(length * SR)) / SR
        turn = 2 * np.pi * (hz * t + glide_hz * t ** 2 / length / 2) + rng.uniform(0, 1, (2, 1))
        turn += np.cumsum(rng.normal(0, 0.022, (2, len(t))), axis=1)
        tone = panned(np.sin(turn), at_hz(PORT_BALANCE, hz))
        add_at(out, s, decibels_to_gain(db) * np.sin(np.pi * t / length) * tone)
    return out


def scene():
    first = exhaust(in_time(EXHAUST_A), COLOUR_A, PIPES_A, low_db=-12.5, top_db=-22, top_gain_db=12.5,
                    surge_low_db=7, surge_s=2.2, start_s=1.95, stop_s=6.95, flutter_db=1.0, top_hz=9760)
    second = exhaust(second_flow(), COLOUR_B, PIPES_B, low_db=-8.5, top_db=-20, top_gain_db=8,
                     surge_low_db=5, surge_s=0.25, start_s=6.93, stop_s=10.5, flutter_db=0.5, top_hz=12840)
    background = pump() + hall() + strands()
    air = reflections(first + second) + valves() + rings() + whistles()
    return background + air + knocks() + panels()


def masking(x):
    gap_from_s, gap_until_s = 2.0, 2.16
    gap_hz, gap_glide_hz_per_s, gap_width_hz = 2800, 2000, 114
    window = np.sin(np.pi * (np.arange(2048) + .5) / 2048)
    lead = np.zeros((2, 1024 - 852))
    hz, s, lines = signal.stft(np.hstack([lead, x]), SR, window, nperseg=2048, noverlap=1024)
    since = s - lead.shape[1] / SR - gap_from_s
    off = (hz[:, None] - gap_hz - gap_glide_hz_per_s * since) / gap_width_hz
    lines *= 1 - np.exp(-off ** 4) * (since > 0) * (since < gap_until_s - gap_from_s)
    power = abs(lines) ** 2
    level = np.mean(power[:, (hz > 4000) & (hz < 9000)], axis=(0, 1)) + 1e-20
    local = uniform_filter1d(uniform_filter1d(power, 25, axis=1), 3, axis=2) + 1e-20
    depth_db = 10 * np.log10(level / local)
    bar = decibels_to_gain(2 * np.interp(depth_db, *THINNING)) * (hz > 9800)[:, None]
    calm = minimum_filter1d(level, size=3)
    kept = (1 + bar) * np.exp(-bar)
    patch = uniform_filter1d(uniform_filter1d(power, 4, axis=1), 2, axis=2)
    patch[:] = patch.mean(axis=0)
    patch[:, hz > 9000] = power[:, hz > 9000]
    audible = patch > calm * decibels_to_gain(2 * at_hz(MASKED, hz))[:, None]
    lines *= (power > bar * local) / np.sqrt(kept) * audible
    out = signal.istft(lines, SR, window, nperseg=2048, noverlap=1024)[1]
    return out[:, lead.shape[1]:][:, :N]


def roll_off(x):
    return signal.sosfilt(signal.butter(12, 16150, fs=SR, output="sos"), x)


def record(dry):
    mix = masking(dry)
    return roll_off(mix)


dry = scene()
out = record(dry)
pcm_store(out)
```